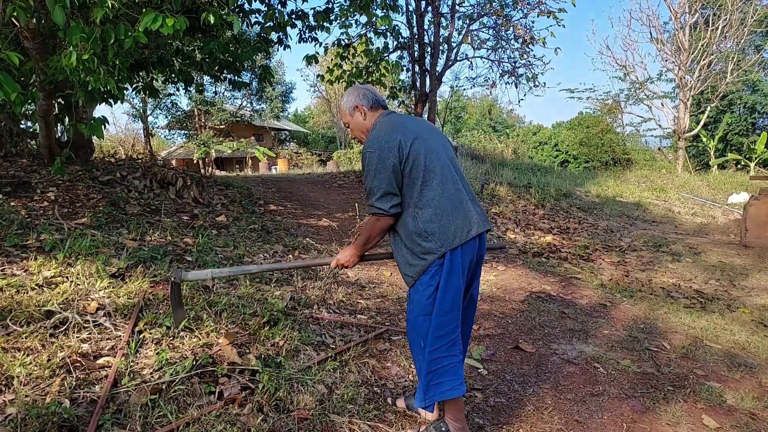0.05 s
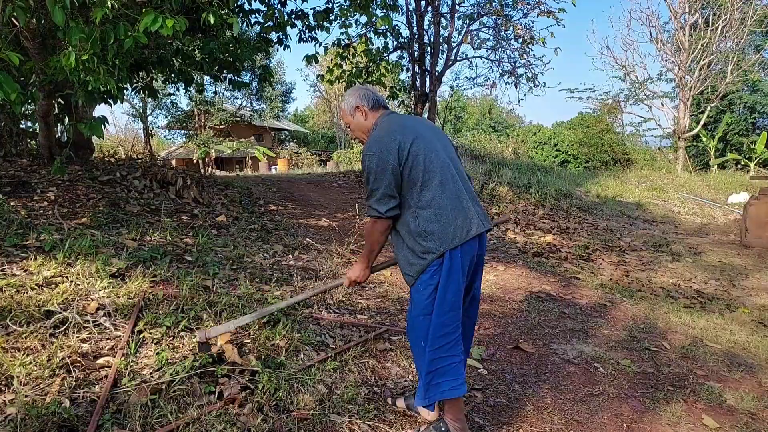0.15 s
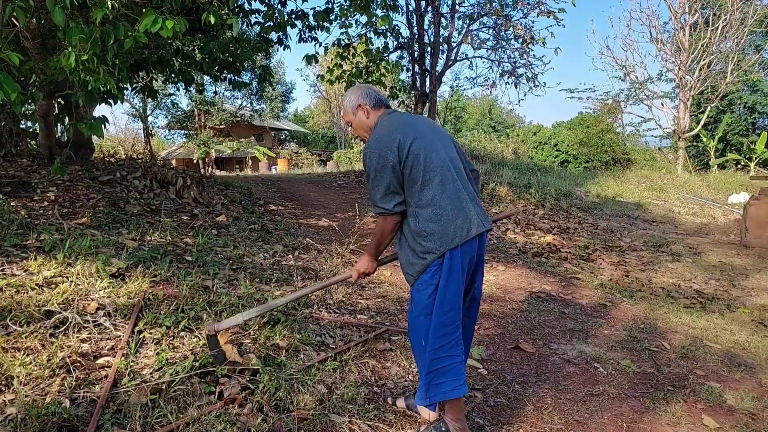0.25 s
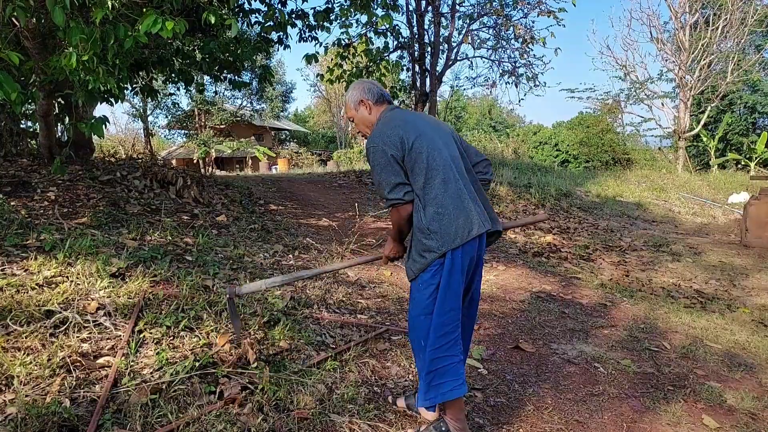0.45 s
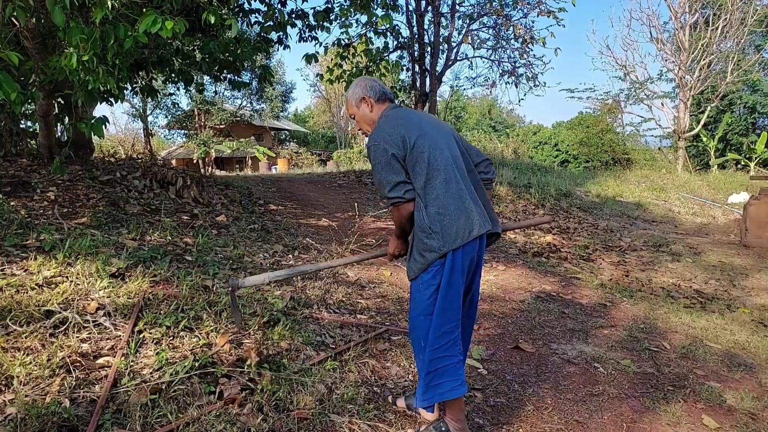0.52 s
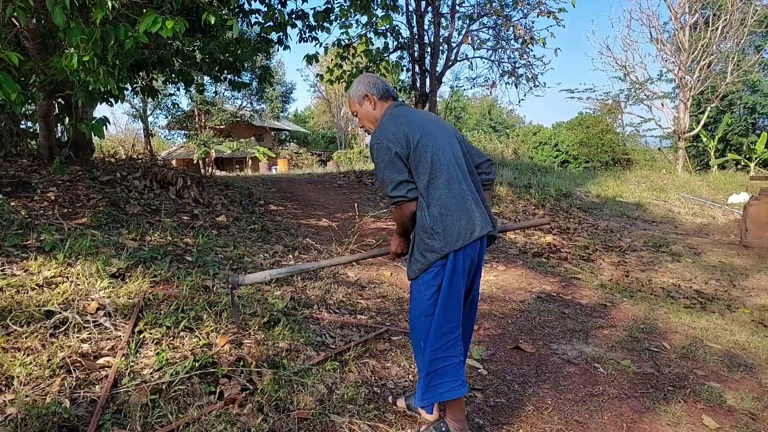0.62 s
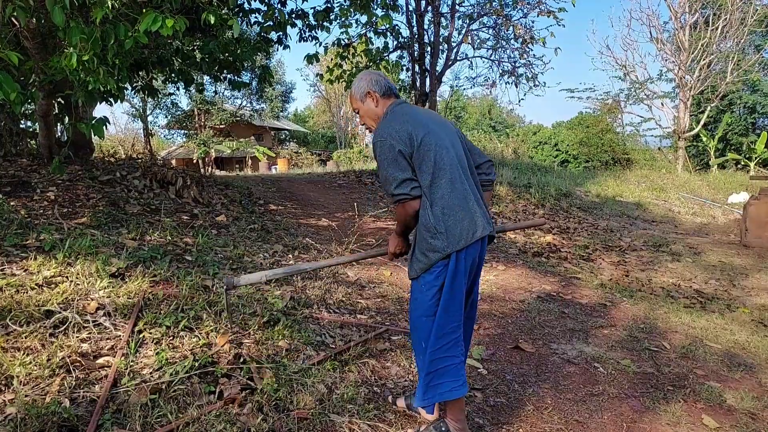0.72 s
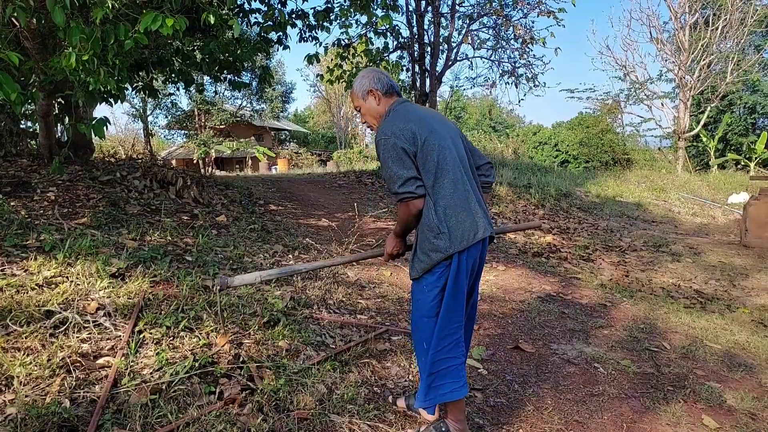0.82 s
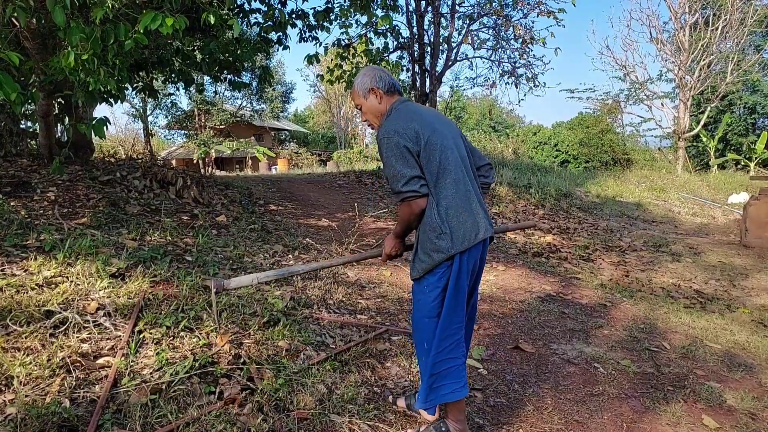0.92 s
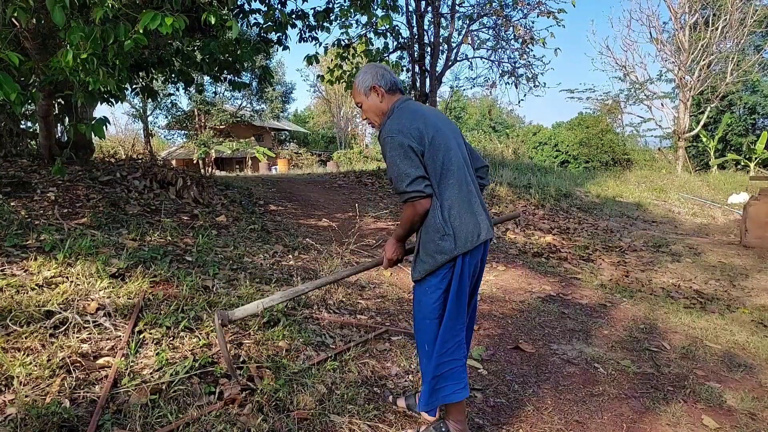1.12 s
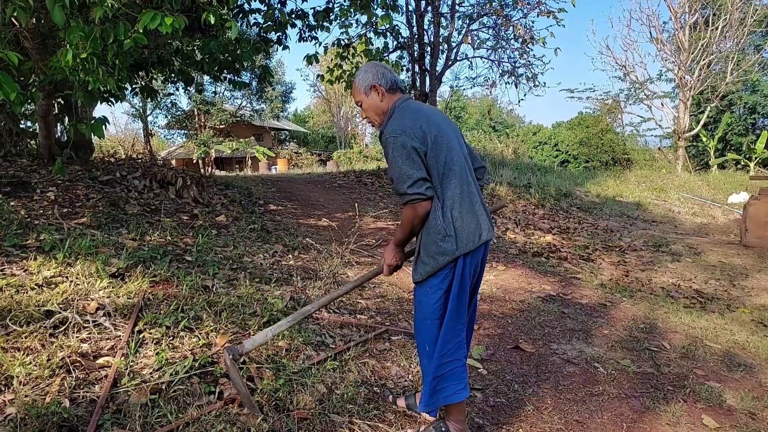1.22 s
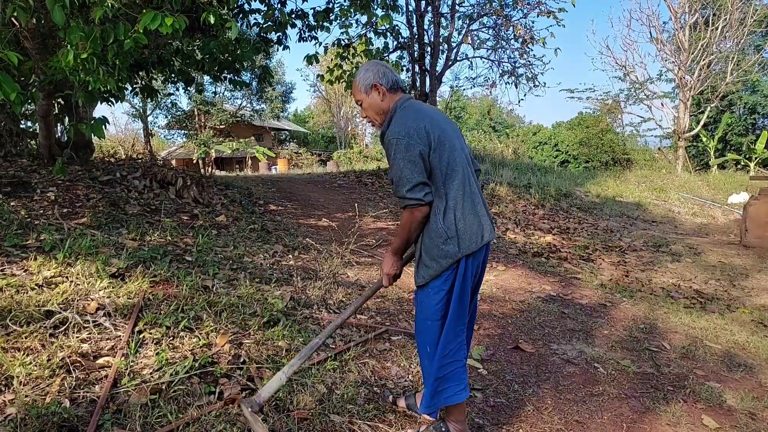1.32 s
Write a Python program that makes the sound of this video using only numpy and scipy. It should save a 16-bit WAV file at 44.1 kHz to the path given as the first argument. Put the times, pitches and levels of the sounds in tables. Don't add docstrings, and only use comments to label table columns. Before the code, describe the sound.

A hoe chops dry soil outdoors, heard close. Quiet air leads to a brief litter brush at 0.21 seconds, then a loud, overloaded steel crack and blunt knock at 0.23. Soil sprays and crunches until about 0.46, with clods and pebbles knocking. Sliding crumbs continue; a thin high ping rings at 0.71. Sparse ticks fade by 1.15, leaving faint air and low rumble.

```python
import sys
import numpy as np
from scipy import signal
from scipy.fft import rfft, irfft
from scipy.io import wavfile
from scipy.ndimage import uniform_filter1d

SR = 44100
rng = np.random.default_rng(int(sys.argv[2]) if len(sys.argv) > 2 else 0)


def wrap_up_sound(samples):
    columns = np.atleast_2d(samples).T
    tamed = np.clip(columns, -1, 1)
    steps = np.round(tamed * 32767).astype(np.int16)
    wavfile.write(sys.argv[1], SR, steps)


def boost(x):
    u = np.asarray(x, float) / 20
    return 10 ** u


N = 59535
T = np.arange(N) / SR
BITE_S = 0.2303
SEAT_S = 0.2378
PING_S = 0.708


def rms_one(x):
    return x / np.sqrt(np.mean(x ** 2) + 1e-20)


def butter(x, order, hz, kind="low"):
    return signal.sosfilt(signal.butter(order, hz, kind, fs=SR, output="sos"), x)


def in_time(rows):
    return np.interp(T, *np.transpose(rows))


def dying(start_s, t60, hold_s=0):
    return (T >= start_s) * boost(-60 * np.maximum(T - start_s - hold_s, 0) / t60)


def drift(rate_hz):
    pole = np.exp(-2 * np.pi * rate_hz / SR)
    noise = rng.standard_normal(N + SR)
    return rms_one(signal.lfilter([1], [1, -2 * pole, pole * pole], noise)[SR:])


def click(time_s, db):
    x = np.zeros(N)
    x[int(time_s * SR)] = boost(db)
    return x


def ring(x, hz, t60):
    radius = boost(-60 / (t60 * SR))
    angle = 2 * np.pi * hz / SR
    return signal.lfilter([0, np.sin(angle)], [1, -2 * radius * np.cos(angle), radius * radius], x + 1e-18)


def knock(x, hz, t60):
    return butter(ring(x, hz, t60), 2, hz / 2, "high")


def tint(x, spectrum):
    hz, db = np.transpose(spectrum)
    bins_hz = np.maximum(np.arange(N // 2 + 1) * SR / N, 1)
    gain = boost(np.interp(np.log(bins_hz), np.log(hz), db))
    return rms_one(irfft(rfft(x) * gain, N))


def hiss(spectrum):
    return tint(rng.standard_normal(N), spectrum)


def hillside_air():
    # pitch_hz, level_db (per Hz)
    air_colour = [(100, -3), (300, -11), (600, -9.5), (1300, -15.5), (4800, -20.5), (6200, -28.5),
                  (11000, -30.5), (15800, -40.5)]
    return boost(-63 + drift(16)) * hiss(air_colour)


def rumble():
    # time_s, level_db
    low_level = [(0, -75.5), (.23, -65.5), (.3, -51), (.4, -69), (.45, -48), (.51, -51), (.56, -53),
                 (.64, -68), (.9, -77), (.96, -62), (1.07, -77), (1.35, -69)]
    # pitch_hz, level_db, t60_s
    ground_modes = [(45, -44.5, 0.076), (75, -38, .2)]
    low = butter(rng.standard_normal(N + SR), 2, [36, 69.4], "band")[SR:]
    push = butter(click(0.248, 6), 2, 60)
    thump = sum(boost(db) * ring(push, hz, t60) for hz, db, t60 in ground_modes)
    return boost(in_time(low_level)) * rms_one(low) + thump


def ping():
    # start_s, level_db
    impacts = [
        (.708, -55),
        (.7125, -51.5),
        (.717, -56),
        (.722, -53),
        (.731, -53),
        (.762, -70),
        (.778, -66.5),
    ]
    # pitch_hz, level_db, t60_s
    steel_modes = [(7964, -4, 0.086), (8050, -1.5, 0.066), (8100, -9, 0.037)]
    wobble_db = 3.5
    mix_db = rng.normal(0, 3.7, (len(impacts), len(steel_modes)))
    steel = 0
    for k, (hz, db, t60) in enumerate(steel_modes):
        hits = sum(click(s, hit_db + db + mix_db[i, k]) for i, (s, hit_db) in enumerate(impacts))
        steel = steel + ring(hits, hz, t60) * boost(wobble_db * drift(150))
    return butter(steel, 2, [7300, 8900], "band")


def clods():
    # start_s, peak_db, pitch_hz, ring_cycles
    lumps = [(.2103, -37, 798, 6.8), (.298, -31, 755, 25), (.299, -35, 1960, 40), (0.321, -31, 1510, 19),
             (.326, -41, 5900, 45), (.339, -39, 790, 15), (0.341, -29.5, 4640, 45), (.355, -46, 4100, 20),
             (0.446, -42.5, 560, 7.7), (.482, -39.5, 378, 11), (0.488, -42, 180, 4), (.490, -47, 650, 5),
             (.604, -43, 1520, 44), (.618, -37, 1000, 8.1), (.625, -39, 1960, 11), (.643, -49, 3200, 12),
             (.723, -38.5, 2700, 20), (0.764, -45, 3200, 17), (0.769, -44, 1470, 12),
             (.799, -45.5, 4840, 20), (.811, -47, 2750, 17), (0.8208, -41.5, 1420, 17),
             (.889, -44, 4020, 4.8), (.902, -44, 1700, 2.5), (1.071, -47, 4600, 4.8), (1.080, -48, 749, 4),
             (1.144, -60.5, 55.4, 3), (1.141, -42, 909, 2.5), (1.141, -47, 3170, 8), (1.142, -54, 307, 6.1)]
    out = 0
    for s, db, hz, cycles in lumps:
        contact = butter(click(s, 0), 4, 1.5 * hz)
        lump = knock(contact, hz, max(cycles, 1) / hz)
        out = out + boost(db) * lump / np.abs(lump).max()
    return out


def crumbs():
    grains_per_s, grain_share, size_spread_db, cycles = 6000, 0.55, 3, 16
    patch_db, patch_hz = 2.5, 45
    bands = 30
    sizes = boost(size_spread_db * np.minimum(rng.exponential(1, N), 3.5)) * rng.choice([-1, 1], N)
    born = rng.random(N) < grains_per_s * boost(3 * drift(25)) / SR
    dealt = rng.integers(0, bands, N)
    grains = 0
    for k, hz in enumerate(np.geomspace(200, 15000, bands)):
        t60 = cycles / hz
        hits = sizes * born * (dealt == k)
        rung = rms_one(ring(ring(hits, hz, t60), hz, t60 / 2))
        grains = grains + rung * np.sqrt(hz) * boost(patch_db * drift(patch_hz))
    spectrum = rfft(grains)
    flat = spectrum / np.sqrt(uniform_filter1d(np.abs(spectrum) ** 2, size=300))
    sliding = rng.standard_normal(N)
    return np.sqrt(grain_share) * rms_one(irfft(flat, N)) + np.sqrt(1 - grain_share) * sliding


def soil():
    # pitch_hz, level_db (per Hz)
    brush_colour = [(120, -42.5), (200, -11), (803, -1.5), (2940, -9.5), (3940, -14), (12700, -33),
                    (15800, -68.5)]
    spray_colour = [(59, -37), (100, -4.5), (631, -16), (965, 1.5), (1270, -17.5), (2450, -8.5),
                    (11300, -28.5), (15800, -46.5)]
    crunch_colour = [(120, -53), (200, -26), (732, -1.5), (1700, -3.5), (2230, -6.5), (4480, -7.5),
                     (6450, -23), (13200, -30.5), (15800, -33.5)]
    flow_colour = [(88, -38.5), (150, -9), (1280, -2.5), (1500, -4), (2840, -8), (4910, -10), (9340, -23.5),
                   (11600, -23.5), (15800, -39.5)]
    # time_s, level_db
    flow_level = [(.27, -41), (.295, -47.5), (.35, -58.5), (.38, -55.5), (.43, -58.5), (.5, -59),
                  (.59, -55), (.605, -53.5), (.63, -51.5), (.655, -54), (.68, -55), (.72, -49.5),
                  (.74, -58), (.775, -58), (.8, -64), (.87, -63.5), (.91, -65.5), (1.05, -88)]
    # start_s, level_db, hold_s, t60_s
    bursts = [
        (0.293, -47, 0.0069, 0.11),
        (0.312, -55.5, 0.0024, 0.036),
        (0.321, -42.5, 0.0093, 0.033),
        (0.333, -48.5, .004, 0.046),
        (0.3379, -39, 0.002, 0.069),
        (0.353, -58, 0.0044, .04),
        (0.438, -53.5, 0.0038, 0.07),
        (0.46, -65, 0.0053, 0.02),
    ]
    grain = crumbs()

    brush_s = 0.2103
    progress = (T - brush_s) / (BITE_S - brush_s)
    brush_level = boost(-45 - 5 * progress) * (T >= brush_s) * (T < SEAT_S)
    brush = tint(grain, brush_colour) * brush_level

    spray = boost(-24) * tint(grain, spray_colour) * dying(BITE_S, 0.083, SEAT_S - BITE_S)
    breaking = sum(boost(db) * dying(s, t60, hold_s) for s, db, hold_s, t60 in bursts)
    crunch = tint(grain, crunch_colour) * breaking
    flow = tint(grain, flow_colour) * boost(in_time(flow_level) + 0.83 * drift(40)) * (T >= SEAT_S)

    bright = rms_one(butter(grain, 2, [5000, 13000], "band"))
    grit = boost(-59) * bright * dying(PING_S, 0.2, 0.015)
    return brush + spray + crunch + flow + grit


def head():
    # pitch_hz, level_db, t60_s
    head_modes = [(215, -24, .06), (573, -16, 0.032), (757, -20, 0.062), (890, 2, 0.016),
                  (1028, -1.5, .018), (1343, -15, .025)]
    # start_s, level_db
    rebounds = [
        (.2435, -31.5),
        (0.2472, -31.5),
        (.2530, -26),
        (0.2557, -27),
        (0.2603, -29.5),
        (0.2662, -35.5),
    ]
    blows = [(SEAT_S, 0)] + rebounds
    mix_db = rng.normal(0, 2.4, (len(blows), len(head_modes)))
    mix_db[0] = 0
    out = 0
    for k, (hz, db, t60) in enumerate(head_modes):
        hits = sum(click(s, 2 + db + hit_db + mix_db[i, k]) for i, (s, hit_db) in enumerate(blows))
        out = out + knock(hits, hz, t60)
    return butter(out, 2, 2567)


def blade():
    # pitch_hz, level_db, t60_s
    blade_modes = [(215, -27, 0.05), (550, -17, 0.023), (910, -5.5, 0.067), (1339, -6, 0.055),
                   (1654, 0, .08), (1960, -2.5, 0.033), (2400.4, -3, 0.11), (3001, -16, 0.03),
                   (3088, -11.5, .05), (3399, -3, 0.038), (4356, -22.5, .03), (5510, -21, 0.038),
                   (7640, -20.5, 0.052)]
    # pitch_hz, level_db (per Hz)
    crack_colour = [(300, -30), (1500, -12), (3500, -3.5), (4500, 8), (7010, -6), (7740, -8),
                    (13000, -13.5), (16000, -18)]
    grip_t60_s = 0.0043
    steel = 0
    for k, (hz, db, t60) in enumerate(blade_modes):
        sign = (-1) ** k
        steel = steel + sign * knock(click(BITE_S, db - 1.5), hz, t60)
    steel = steel * dying(BITE_S, grip_t60_s, SEAT_S - BITE_S)
    crack = boost(-20.5) * hiss(crack_colour) * dying(BITE_S, 0.012, 0.0078)
    return steel + crack


def scene():
    return (hillside_air() + rumble() + ping() + clods() + soil() + head() + blade())[None]


def roll_off(x):
    return signal.sosfilt(signal.butter(12, 16030, fs=SR, output="sos"), x)


def record(dry):
    clip_level, knee = 0.66, 6
    clipped = dry / (2 + np.abs(dry / clip_level) ** knee) ** (1 / knee)
    lost = clipped - dry
    no_lows = signal.butter(2, 300, "high", fs=SR, output="sos")
    x = dry + signal.sosfiltfilt(no_lows, lost)
    x = butter(x, 2, 30, "high")
    x = signal.sosfilt(signal.cheby2(12, 70, 16500, fs=SR, output="sos"), x)
    return roll_off(x)


dry = scene()
out = record(dry)
wrap_up_sound(out)
```